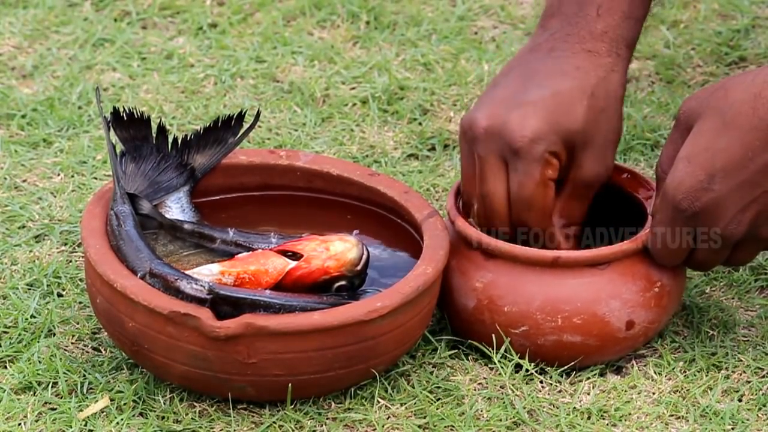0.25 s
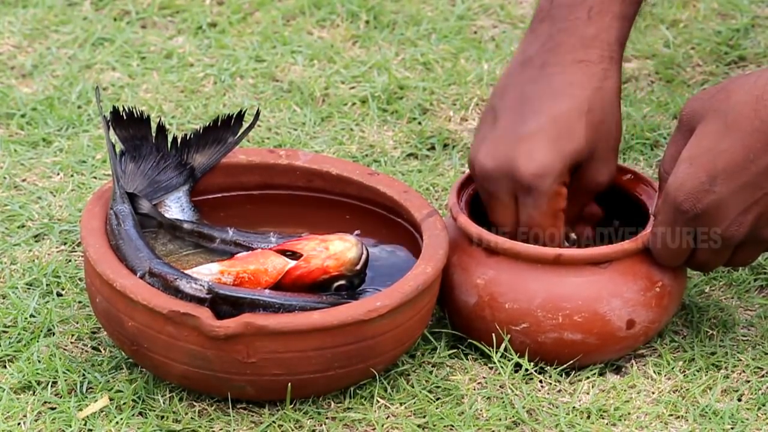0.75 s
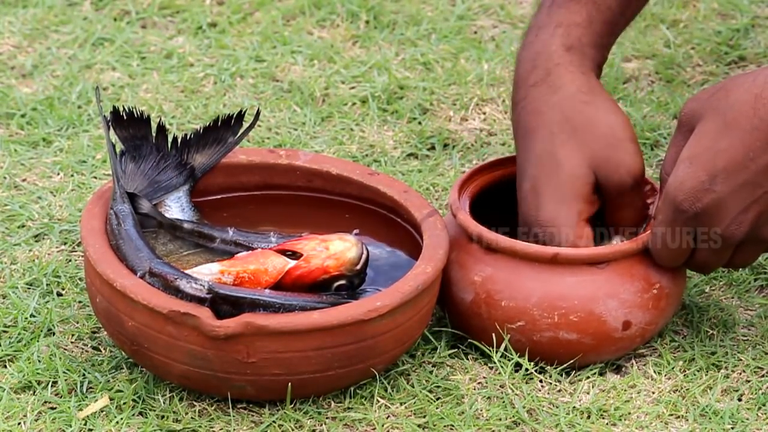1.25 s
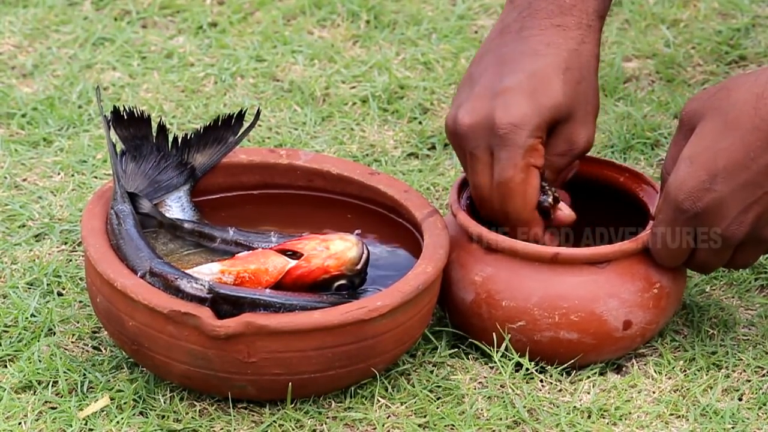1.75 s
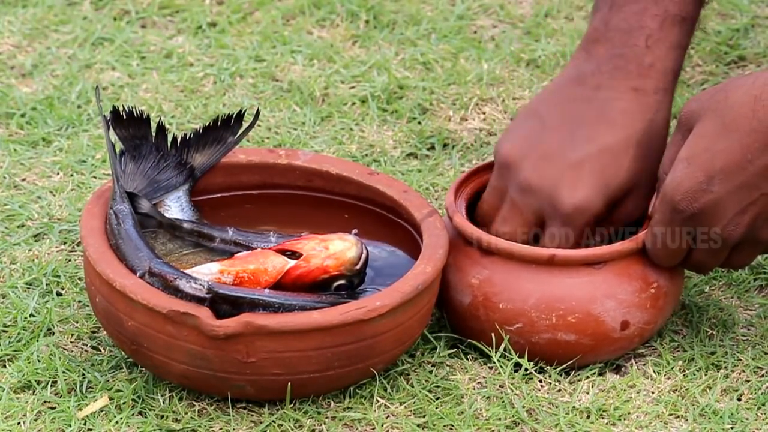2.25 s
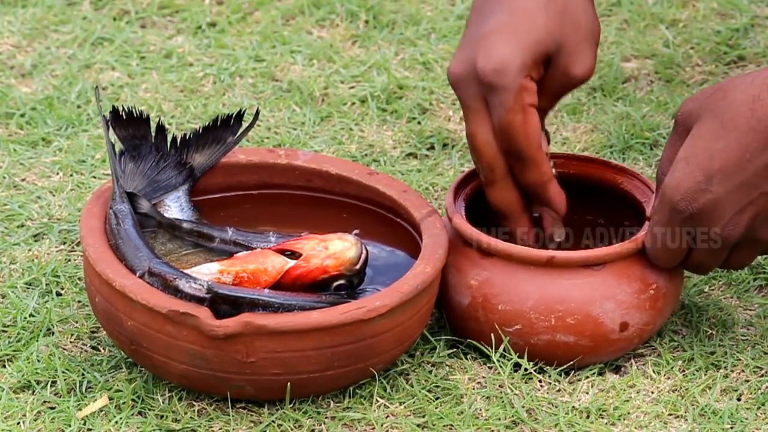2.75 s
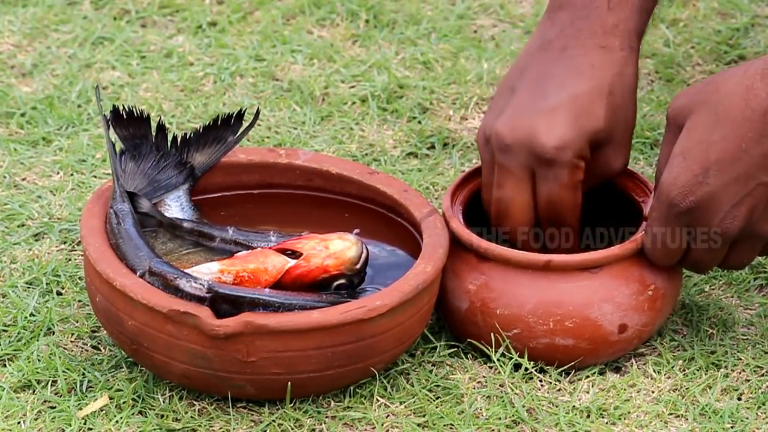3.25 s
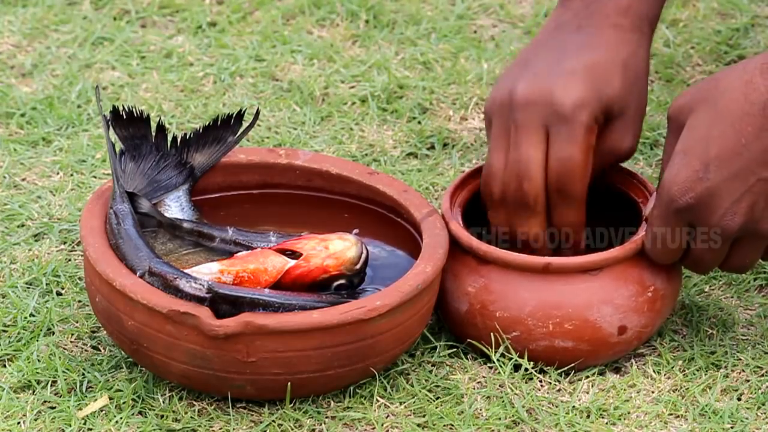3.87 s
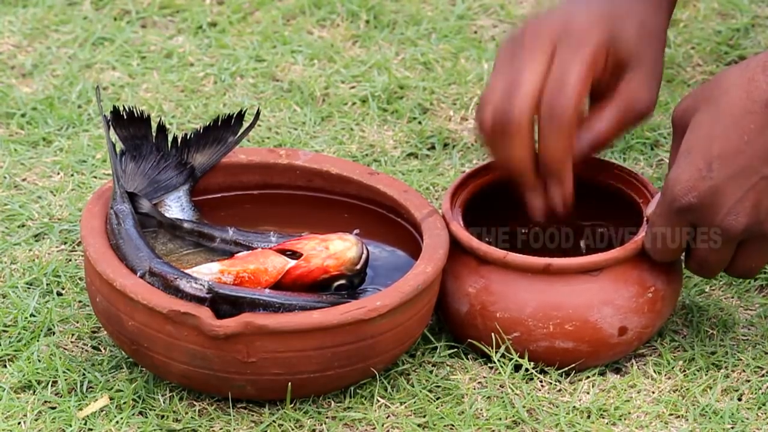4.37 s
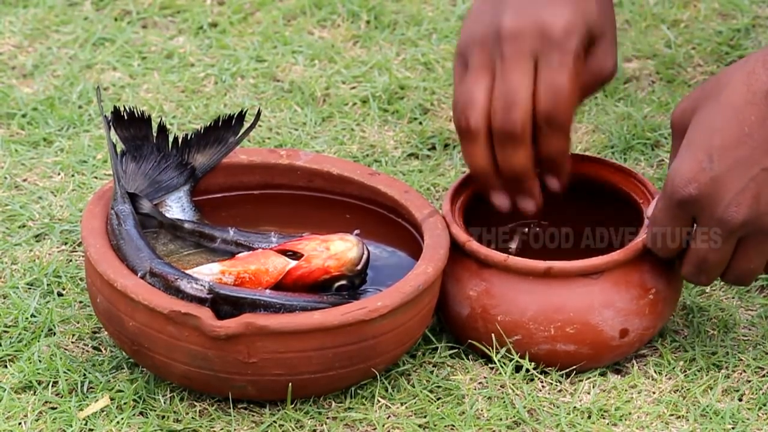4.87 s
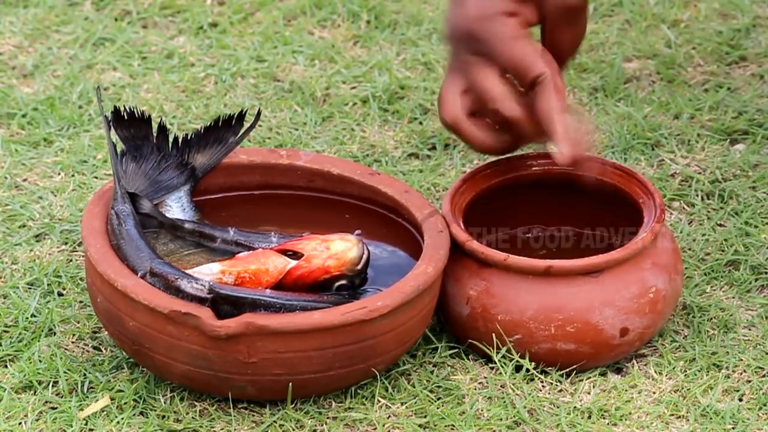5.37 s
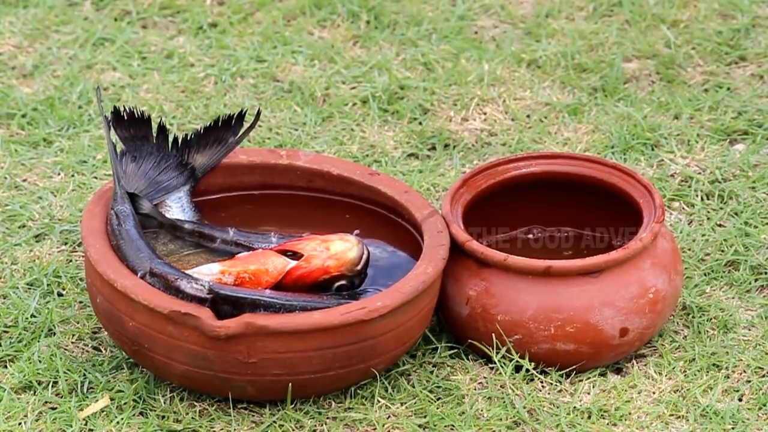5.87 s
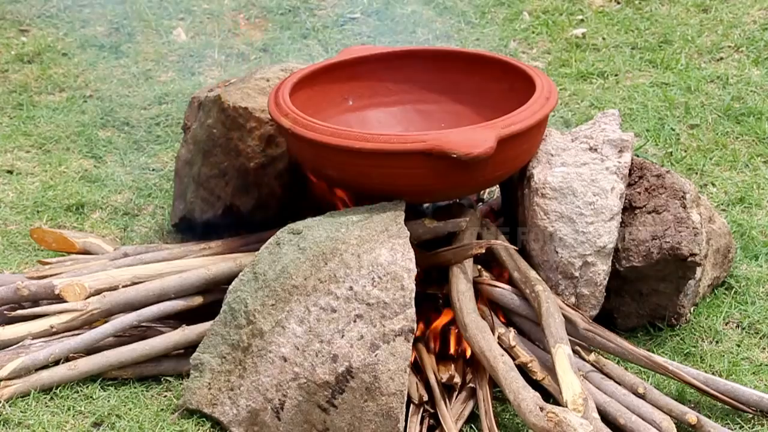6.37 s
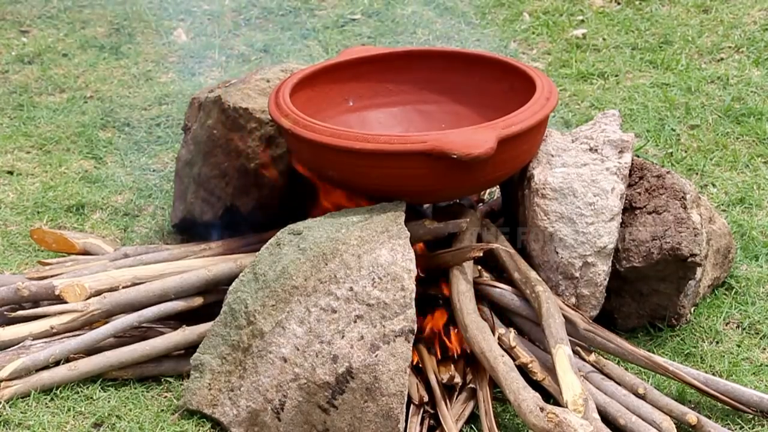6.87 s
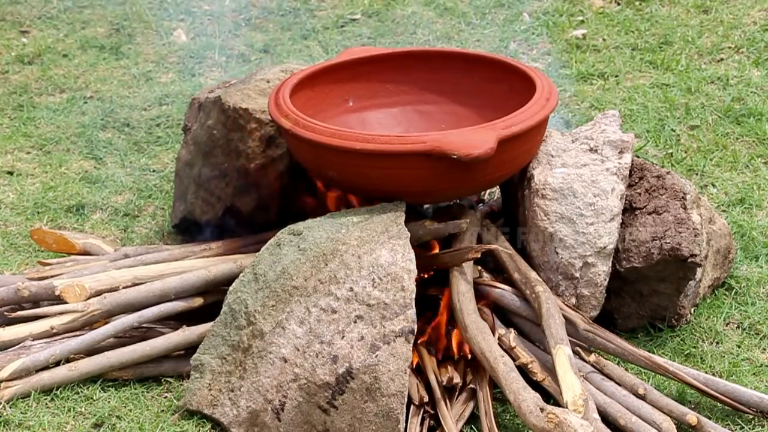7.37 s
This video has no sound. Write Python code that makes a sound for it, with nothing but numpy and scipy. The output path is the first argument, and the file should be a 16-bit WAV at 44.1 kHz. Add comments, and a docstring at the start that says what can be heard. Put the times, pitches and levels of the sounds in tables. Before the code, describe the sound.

Thin, very high birdsong repeats every three seconds outdoors; farther birds twitter, one whistles, another rattles harshly, then dry knocks, rustling and sudden quieter air.

```python
"""Birds round a village garden

A small bird close by sings three very high phrases: five or six falling slurs, then quick double notes, all gliding
sines scattered back by foliage. Others further off warble (sliding sines), buzz (pulsed noise bands) and whistle; a dry
churr (pulses through resonances), a few knocks (damped sines) and a noisy rustle follow.
Low outdoor noise stops near the end, leaving fainter air, a hum and twitter."""
import sys
import numpy as np
from scipy import signal
from scipy.fft import rfft, irfft, next_fast_len
from scipy.io import wavfile

SR = 44100
rng = np.random.default_rng(int(sys.argv[2]) if len(sys.argv) > 2 else 0)


def persist_wave(psi):
    """Save psi, clipped to +-1, as 16-bit WAV."""
    counts = np.round(np.clip(psi, -1, 1) * 32767).astype(np.int16)
    wavfile.write(sys.argv[1], SR, np.atleast_2d(counts).T)


N = 336042
TIME = np.arange(N) / SR
AIR_END_S = 6.8
# pitch jitter of the hoarser birds, heard in ticks and once the outdoor noise has stopped
HOARSE_RASP_HZ = 105


def undb(db):
    """Amplitude ratio: 20 dB is a factor of ten in gain."""
    return 10 ** (np.asarray(db) / 20)


def unit(x):
    """Normalisation to an effective (rms) value of 1."""
    return x / np.sqrt(np.mean(x ** 2))


def add(track, start_s, sound):
    """Linear superposition of a sound on a track from start_s."""
    i = int(round(start_s * SR))
    a, b = max(i, 0), min(i + len(sound), N)
    track[a:b] += sound[a - i:b - i]


def wander(size, rate_hz):
    """Low-frequency random modulation: straight lines between normal draws made rate_hz times a second."""
    t = np.arange(size) / SR * rate_hz
    draws = rng.standard_normal(int(t[-1]) + 2)
    return np.interp(t, np.arange(len(draws)), draws)


def band(x, hz, width_hz):
    """Cascaded resonance: two equal peaks give unit gain at the centre and steep skirts."""
    # each peak is wider than stated, so that the pair together has the stated width
    b, a = signal.iirpeak(min(hz, .45 * SR), hz / width_hz * np.sqrt(np.sqrt(2) - 1), fs=SR)
    once = signal.lfilter(b, a, x)
    return signal.lfilter(b, a, once)


def colour(x, points):
    """Spectral shaping: gain points (hz, db) are joined along a logarithmic frequency axis."""
    hz, db = np.transpose(points)
    size = next_fast_len(N)
    f = np.maximum(np.fft.rfftfreq(size, 1 / SR), 1)
    gain = undb(np.interp(np.log(f), np.log(hz), db))
    return irfft(rfft(x, size) * gain, size)[:N]


def swell(s, db):
    """Amplitude envelope along a level curve, silent outside it."""
    return undb(np.interp(TIME, s, db)) * (TIME >= s[0]) * (TIME <= s[-1])


def foliage(x, early_db, early_t60, late_db, late_t60, gap_s=0.0018):
    """Multiple scattering, echo only: sparse reflections from near branches and a diffuse decaying tail."""
    t = np.arange(SR) / SR
    onset = np.clip(t / gap_s - 1, 0, 1)
    # cubing the noise leaves a few strong reflections
    early = rng.standard_normal(SR) ** 3 * onset * undb(-60 * t / early_t60)
    late = rng.standard_normal(SR) * onset * undb(-60 * t / late_t60)
    response = undb(early_db) * early / np.linalg.norm(early) + undb(late_db) * late / np.linalg.norm(late)
    return signal.fftconvolve(x, response)[:N]


def tone(hz):
    """Frequency modulation: the phase of a sine is the running sum of its pitch curve."""
    return np.sin(2 * np.pi * np.cumsum(hz) / SR)


def air(spectrum, db, side_spectrum, width=1, gust_db=1.28):
    """Broadband noise with a slow random level; independent mid and side parts give it stereo width."""
    mid, side = (unit(colour(rng.standard_normal(N), spectrum)) for _ in range(2))
    spread = width * colour(side, side_spectrum)
    return undb(db + gust_db * wander(N, 7.6)) * (mid + np.outer([1, -1], spread))


def outdoor_air():
    """Shaped random noise, strongest in the bass, with a stereo width that follows a time curve."""
    # relative spectrum: hz, density_db
    spectrum = [(15, -28), (25, 2), (132, -1), (216, -4.5), (246, -5), (425, -5.5), (697, -8), (794, -9),
                (1730, -15), (2130, -16.5), (4780, -18), (5880, -19), (12500, -24), (16200, -44),
                (22000, -120)]
    # side level relative to mid, before the time curve: hz, side_db
    side_spectrum = [(30, -19), (120, -26), (350, -33.5), (1200, -14.5), (3500, -6.5), (5000, -28.5)]
    # stereo width over time: time_s, side_gain_db
    width_curve = [(0, -0.5), (2.75, 2), (2.9, -31.5), (5.05, -25), (5.2, 16), (5.85, -4), (5.97, -22)]
    width = undb(np.interp(TIME, *np.transpose(width_curve)))
    return air(spectrum, -40.5, side_spectrum, width=width)


def glide(length_s, start_hz, end_hz, bend):
    """Power-law pitch glide; with a bend over 1 it moves fast at first and levels out."""
    return end_hz + (start_hz - end_hz) * np.linspace(1, 0, int(length_s * SR)) ** bend


def slurs(bend=2.06, rise_s=.018, sag_db=5, slur_db=0.94, hook_s=.002, hook_hz=1300, waver_hz=90):
    """Frequency-swept whistles hook up, dive and level out, wider and longer through each phrase."""
    # the near bird's falling slurs: start_s, relative level_db
    slur_onsets = [(-.008, -23), (0.101, -15), (0.197, -10), (.299, -8), (.395, -10), (.489, -10),
                   (2.828, -17), (2.931, -10), (3.036, -7.5), (3.138, -6), (3.237, -5.5), (3.331, -5.5),
                   (5.622, -18.5), (5.719, -13), (5.821, -8), (5.917, -8), (6.015, -8)]
    # its phrases: start_s, length of the first slur first_s, climb of the top pitch climb_hz_per_s
    phrases = [(-.01, 0.036, 4500), (2.826, 0.031, 5400), (5.62, .041, 7390)]
    # a phrase's first slur falls from top to end; the later ones end lower and last longer
    top_hz, end_hz, end_sag_hz_per_s, stretch_s_per_s = 10650, 8010, 950, .016
    fall_s, waver_rate_hz = .014, 300
    out = np.zeros(N)
    for s, db in slur_onsets:
        start_s, first_s, climb = min(phrases, key=lambda phrase: abs(phrase[0] - s))
        elapsed = s - start_s
        length = first_s + stretch_s_per_s * elapsed
        hz = glide(length, top_hz + climb * elapsed, end_hz - end_sag_hz_per_s * elapsed, bend)
        # the final pitch is held while the note fades
        hz = np.pad(hz, (0, int(fall_s / 2 * SR)), mode="edge")
        t = np.arange(len(hz)) / SR
        hz = hz - hook_hz * np.exp(-t / hook_s) + waver_hz * wander(len(t), waver_rate_hz)
        attack = np.sin(np.pi / 2 * np.clip(t / rise_s, 0, 1)) ** 2
        release = np.clip((t[-1] - t) / fall_s, 0, 1)
        sag = sag_db * (t / length) ** 2
        add(out, s, attack * release * undb(db + slur_db - sag) * tone(hz))
    return out


def double_notes(double_db=0.5, taper=0.96, late_peak=1.21, waver_hz=110):
    """Successive pitch sweeps: the whistle dives, flicks up, dives again and trails off low."""
    # double notes that close each phrase: start_s, relative level_db
    double_onsets = [(0.5814, -9.5), (0.685, -9.5), (0.788, -10.5), (3.4244, -7), (3.5238, -8), (3.623, -8),
                     (6.107, -7.5), (6.2132, -10.5), (6.3173, -10), (6.4308, -11.5)]
    # the four strokes of every double note: delay_s, length_s, start_hz, end_hz, bend, relative level_db
    strokes = [(-.001, .019, 12400, 6967, .68, -0.5), (.025, 0.01, 8400, 12000, .9, -6),
               (0.0324, .015, 12000, 6660, 1.05, -0.5), (.047, .023, 6600, 4623, 1.46, -20)]
    out = np.zeros(N)
    for s, db in double_onsets:
        for delay, length, start_hz, end_hz, bend, stroke_db in strokes:
            hz = glide(length, start_hz, end_hz, bend)
            # each stroke swells and stops quickly
            effort = abs(np.sin(np.pi * np.linspace(0, 1, len(hz)) ** late_peak)) ** taper
            voice = tone(hz + waver_hz * wander(len(hz), 300))
            add(out, s + delay, effort * undb(db + stroke_db + double_db) * voice)
    return out


def near_bird(flutter_db=2.0):
    """Frequency-dependent directivity: direct song, slightly unsteady, plus its coloured scatter."""
    # the beak aims its highest notes; the lower ones spread into the leaves: hz, echo_gain_db
    echo_colour = [(4500, 9.5), (6300, 12.5), (7800, 2), (10000, -1), (12500, 0)]
    song = (slurs() + double_notes()) * undb(flutter_db * wander(N, 300))
    echo = foliage(song, early_db=-7.5, early_t60=0.11, late_db=-9.5, late_t60=0.4)
    return song + colour(echo, echo_colour)


def note(length_s, start_hz, turn_hz, db, rasp_hz, sweep=1.95, ease=.75, flutter_db=3.5):
    """Combined frequency and amplitude modulation: a quick slide to a turning pitch that eases back a little."""
    u = np.linspace(0, 1, int(length_s * SR))
    slide = (turn_hz - start_hz) * np.sin(sweep * u ** ease)
    hz = start_hz + slide + rasp_hz * wander(len(u), 901)
    effort = np.sqrt(2 * abs(np.sin(np.pi * u)))
    return effort * undb(db + flutter_db * wander(len(u), 117)) * tone(hz)


def far_birds(buzz_depth=0.3):
    """Two kinds of modulation: short sliding tones, and amplitude-pulsed noise bands that swell quickly and fade."""
    # clearest notes of the warblers further off: start_s, length_s, start_hz, turn_hz, level_db
    far_notes = [(0.148, 0.13, 3000, 6140, -45.5), (0.193, 0.11, 3400, 3540, -44),
                 (1.256, 0.029, 4200, 3510, -38.5), (1.32, 0.082, 4000, 4590, -40.5),
                 (1.39, 0.085, 3600, 3160, -35), (1.475, .075, 4200, 3510, -34),
                 (1.611, .033, 3400, 3410, -36.5), (1.654, 0.052, 3900, 4600, -42),
                 (1.732, 0.048, 3000, 3580, -34.5), (1.795, 0.037, 3300, 4070, -35.5),
                 (1.821, .048, 4200, 3360, -29.5), (1.982, .052, 4000, 4800, -41),
                 (2.052, .046, 2700, 3990, -32.5), (2.098, 0.052, 2900, 4060, -30.5),
                 (2.15, 0.05, 2700, 4090, -33), (2.191, .06, 3950, 2980, -36.5),
                 (2.198, .035, 4100, 4280, -34.5), (2.469, 0.041, 4000, 3410, -35),
                 (2.528, .048, 5100, 3390, -32), (2.583, 0.027, 2950, 3500, -34.5),
                 (2.639, .026, 2950, 3310, -35), (2.657, 0.068, 4700, 4250, -42),
                 (6.822, 0.082, 4400, 3100, -46.5), (6.915, 0.055, 2180, 2050, -53),
                 (6.929, 0.075, 4700, 4630, -47), (7.007, 0.053, 2610, 2640, -46),
                 (7.05, 0.044, 4700, 8970, -53), (7.114, .075, 5300, 4130, -47),
                 (7.325, 0.063, 7800, 6040, -42.5), (7.381, .06, 3600, 4310, -34),
                 (7.475, .035, 4800, 8500, -44.5)]
    # buzzy calls: start_s, length_s, centre_hz, width_hz, pulses_per_s, level_db
    buzzes = [(1.197, 0.18, 7700, 2200, 59, -46), (1.431, 0.26, 8100, 870, 82, -42),
              (1.438, 0.21, 4900, 1600, 85, -42), (1.373, 0.14, 1610, 400, 51, -42.5),
              (2.022, 0.64, 5180, 50, 12, -41.5), (2.036, .5, 4930, 50, 9.9, -42.5),
              (7.468, 0.21, 6500, 2400, 37, -46)]
    clear_rasp_hz = 45.1
    out = np.zeros(N)
    for s, length, start_hz, turn_hz, db in far_notes:
        rasp_hz = clear_rasp_hz if s < AIR_END_S else HOARSE_RASP_HZ
        add(out, s, note(length, start_hz, turn_hz, db, rasp_hz))
    for s, length, hz, width_hz, rate, db in buzzes:
        u = np.linspace(0, 1, int(length * SR))
        pulses = 1 + buzz_depth * np.cos(2 * np.pi * rate * length * u)
        hiss = unit(band(rng.standard_normal(len(u)), hz, width_hz))
        add(out, s, undb(db) * np.sin(np.pi * u ** 0.44) * pulses * hiss)
    return out


def wind():
    """Low-frequency wind noise, uncorrelated at the two microphones, in soft puffs."""
    # puffs of wind on the microphones: start_s, length_s, level_db
    puffs = [(0.769, 0.146, -38), (5.169, 0.757, -38.5)]
    out = np.zeros((2, N))
    for channel in out:
        for s, length, db in puffs:
            u = np.linspace(0, 1, int(length * SR))
            rumble = unit(band(rng.standard_normal(len(u)), 93, 87))
            add(channel, s, undb(db) * np.sin(np.pi * u) ** .5 * rumble)
    return out


def twitter(start_s, end_s, centre_hz, range_octaves, db, rasp_hz, count, length_s=0.0401, slide=.22, spread_db=3):
    """Random superposition of faint notes, each with its own pitch, slide, length and level."""
    out = np.zeros(N)
    for k, (late, long, high, slope, loud) in enumerate(rng.uniform(-1, 1, (count, 5))):
        s = start_s + (end_s - start_s) * (k + (1 + late) / 2) / count
        hz = centre_hz * 2 ** (range_octaves * high)
        length = length_s * 2 ** (long / 2)
        add(out, s, note(length, hz * (1 + slide * slope), hz, db + spread_db * loud, rasp_hz))
    return out


def flock():
    """Event density: scattered notes behind the warblers, then in the quiet at the end, where they grow livelier."""
    return (twitter(1.12, 2.72, centre_hz=3880, range_octaves=.42, db=-48, rasp_hz=70.2, count=24)
            + twitter(6.82, 7.2, centre_hz=4420, range_octaves=1.05, db=-53, rasp_hz=110, count=11)
            + twitter(7.44, 7.6, centre_hz=4600, range_octaves=.35, db=-44.5, rasp_hz=100, count=5))


def nasal_call(s=3.96, length_s=.27, start_hz=2940, turn_hz=2820, partials_db=(-48, -53, -45), rasp_hz=70):
    """Harmonic series: three partials make one faint, slightly falling call."""
    out = np.zeros(N)
    for k, db in enumerate(partials_db, 1):
        add(out, s, note(length_s, k * start_hz, k * turn_hz, db, rasp_hz))
    return out


def ticks(s=3.988, period_s=.034, length_s=0.0086, start_hz=2800, turn_hz=4200, db=-43.5, count=4):
    """Periodic repetition of a brief upward sweep: a bird's quick run of tiny ticks."""
    out = np.zeros(N)
    for k in range(count):
        add(out, s + k * period_s, note(length_s, start_hz, turn_hz, db, HOARSE_RASP_HZ))
    return out


def whistle(side_hz=280, lower_db=-17, upper_db=-28, hoarse_db=-17):
    """Modulation sidebands: a fast tremble of the syrinx puts a weak line on either side of a held note."""
    start_s, peak_s, end_s, attack_s = 4.555, 4.693, 5.2, 0.035
    peak_db, swell_db_per_s, fade_db_per_s = -26, 80, 41.5
    hz = 4408 + 10 * wander(N, 65) + 9 * wander(N, 14)
    tremble = side_hz + 14 * wander(N, 61)
    lower = undb(lower_db + 3 * wander(N, 35)) * tone(hz - tremble)
    upper = undb(upper_db) * tone(hz + tremble)
    lines = tone(hz) + lower + upper
    past_peak = TIME - peak_s
    gate = np.clip(np.minimum(TIME - start_s, end_s - TIME) / attack_s, 0, 1)
    effort = gate * undb(peak_db + np.minimum(swell_db_per_s * past_peak, -fade_db_per_s * past_peak))
    breath = undb(hoarse_db) * unit(band(rng.standard_normal(N), 4300, 280))
    return effort * (np.sqrt(2) * lines + breath)


def churr(low_hz=1150, high_hz=2050, noise_db=-3, scatter_db=1, first_s=5.2225):
    """Source and filter: pulses of a hoarse upward-sweeping voice excite the throat's resonances."""
    # course of the churr: time_s, pulses_per_s, level_db
    course = [(5.1, 65, -60), (5.15, 65.14, -42), (5.22, 64.9, -37.5), (5.226, 65.57, -28),
              (5.35, 64.6, -28.5), (5.4, 64.97, -24.5), (5.5, 72.37, -25), (5.74, 67.44, -24.5),
              (5.86, 63.7, -29), (5.9, 65.8, -47)]
    # resonances of the throat: centre_hz, width_hz, relative level_db
    throat_modes = [(1356, 280, 5), (1980, 250, 5), (2664, 290, 10), (3920, 430, 2), (5270, 760, 1.5),
                    (5810, 730, 2), (7720, 1200, 2), (8880, 210, -8.5), (11150, 1700, -4.5)]
    s, rate, db = np.transpose(course)
    turns = np.cumsum(np.interp(TIME, s, rate)) / SR
    # one pulse begins exactly at first_s
    phase = (turns - np.interp(first_s, TIME, turns)) % 1
    effort = swell(s, db)
    pulses = (.25 + np.sin(np.pi * phase) ** 2) * undb(scatter_db * wander(N, 70))
    # hoarser when louder
    jitter = .11 * effort / effort.max() * wander(N, 1800) + .04 * wander(N, 130)
    climb = np.sin(np.pi / 2 * np.clip(phase / .6, 0, 1)) ** 2
    hz = (low_hz + (high_hz - low_hz) * climb) * (1 + jitter)
    harmonics = unit(sum(tone(k * hz) for k in range(1, 8)))
    voice = harmonics + undb(noise_db) * rng.standard_normal(N)
    throat = sum(undb(mode_db) * band(pulses * voice, mode_hz, width_hz)
                 for mode_hz, width_hz, mode_db in throat_modes)
    return effort * unit(throat)


def knocks(cycles=0.6, knock_db=3, crack_db=-17, grain_db=4):
    """Heavily damped oscillation, dead within about a cycle, over a grainy noise rustle that flares with it."""
    # dry knocks: start_s, ring_hz, relative level_db
    hits = [(5.9697, 1060, -9.5), (5.9738, 1170, -17), (5.9763, 1470, -10.5), (6.064, 760, -24),
            (6.071, 796, -21.5), (6.377, 1330, -15.5), (6.446, 1110, -25), (6.631, 870, -24.5),
            (6.64, 840, -22), (6.752, 786, -31)]
    rustle_start_s, rustle_end_s, rustle_db, flare_db, flare_s = 6.04, 6.8, -43, -41.5, 0.0093
    out, flare = np.zeros(N), np.zeros(N)
    t = np.arange(SR // 50) / SR
    for s, hz, db in hits:
        crack = undb(crack_db) * unit(band(rng.standard_normal(len(t)), 3700, 2600))
        ring = np.sin(2 * np.pi * hz * t)
        add(out, s, undb(db + knock_db) * np.exp(-hz * t / cycles) * (ring + crack))
        flare = np.maximum(flare, np.exp(-abs(TIME - s) / flare_s))
    grains = rng.standard_normal(N) * undb(grain_db * wander(N, 300))
    rustle = unit(colour(grains, [(200, -7), (500, -3.5), (750, 1.0), (1500, -6.0), (3000, -13.5), (8000, -24.5)]))
    audible = (TIME > rustle_start_s) * (TIME < rustle_end_s)
    stir = (undb(rustle_db) + undb(flare_db) * flare) * audible
    return colour(out, [(150, -26), (600, 5.5), (3000, 4), (9000, 11)]) + stir * rustle


def quiet_air():
    """Noise plus a pure tone: faint shaped air and a low hum with a phase offset between the channels."""
    # relative spectrum: hz, density_db
    spectrum = [(25, -25.5), (130, -13), (220, -19), (500, -1.5), (900, -1), (1800, -7.5), (4600, -2),
                (6200, -7.5), (10000, -21.5), (12000, -31)]
    # side level relative to mid: hz, side_db
    side_spectrum = [(30, -8), (500, -6), (1500, 0.5), (3800, 6), (5000, -16.5)]
    hum_hz, hum_db = 91, -58.5
    phase_rad = np.array([[0], [.9]])
    hum = undb(hum_db) * np.sqrt(2) * np.sin(2 * np.pi * hum_hz * TIME + phase_rad)
    return air(spectrum, -50, side_spectrum) + hum


def scene(late_echo_db=3):
    """Direct and diffuse fields: near sounds sit in the middle, far echoes spread wide and strengthen at the end."""
    open_air = np.clip((AIR_END_S - TIME) / 0.0087, 0, 1)
    far = far_birds() + nasal_call() + ticks() + flock()
    # independent echoes on the two sides
    echoes = np.array([foliage(far, early_db=-14, early_t60=.1, late_db=-13, late_t60=.6) for _ in range(2)])
    far = far + undb(late_echo_db * (1.5 - open_air)) * echoes
    rasp = churr()
    rasp_echoes = np.array([foliage(rasp, early_db=-10.5, early_t60=.06, late_db=-20, late_t60=.2, gap_s=.0005)
                            for _ in range(2)])
    rasp = rasp + rasp_echoes
    background = open_air * outdoor_air() + (1 - open_air) * quiet_air()
    return near_bird() + far + whistle() + rasp + knocks() + wind() + background


def record(dry):
    """Mid-side filtering: the treble is nearly mono and the top is cut steeply."""
    # stereo width by frequency: hz, side_gain_db
    side_gain = [(1000, -2), (2500, -1), (4000, 0), (5500, -17), (12000, -30.5)]
    mid = (dry[0] + dry[1]) / 2
    side = colour((dry[0] - dry[1]) / 2, side_gain)
    # low-pass at 12400 Hz: order 8, 0.2 dB ripple, 70 dB rejection
    top = signal.ellip(8, .2, 70, 12400, fs=SR, output="sos")
    return signal.sosfilt(top, np.array([mid + side, mid - side]))


dry = scene()
out = record(dry)
persist_wave(out)
```